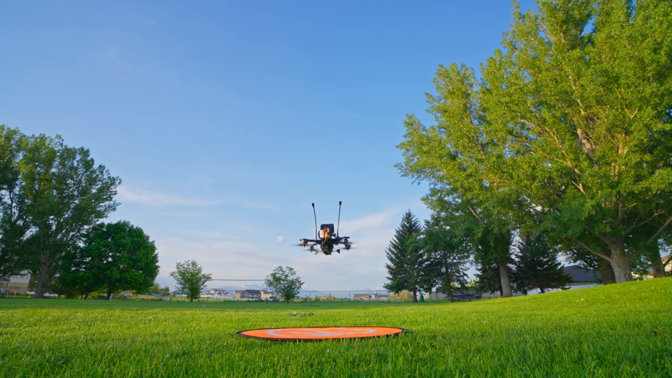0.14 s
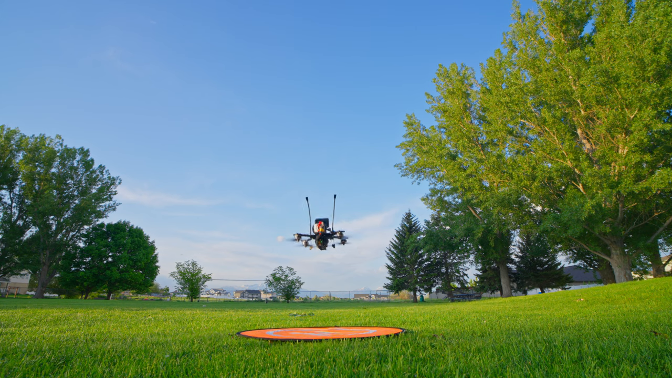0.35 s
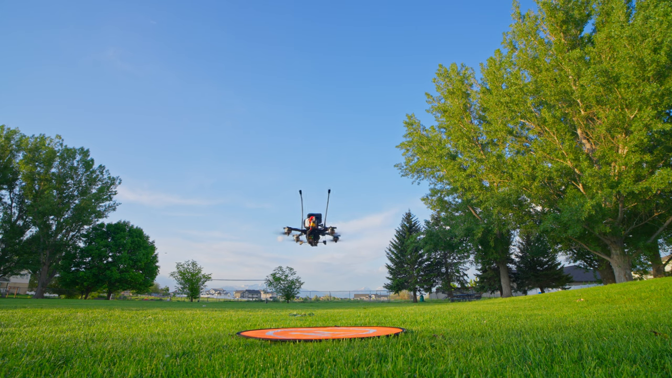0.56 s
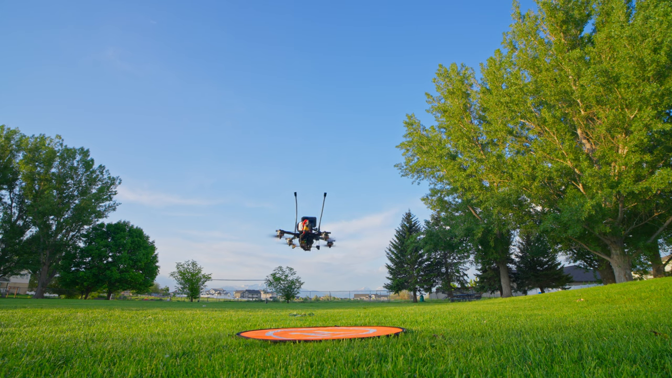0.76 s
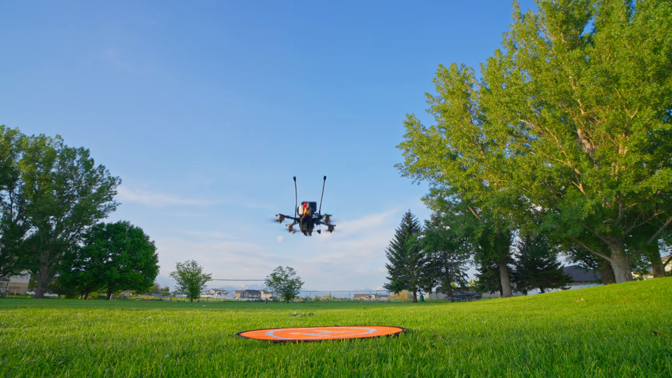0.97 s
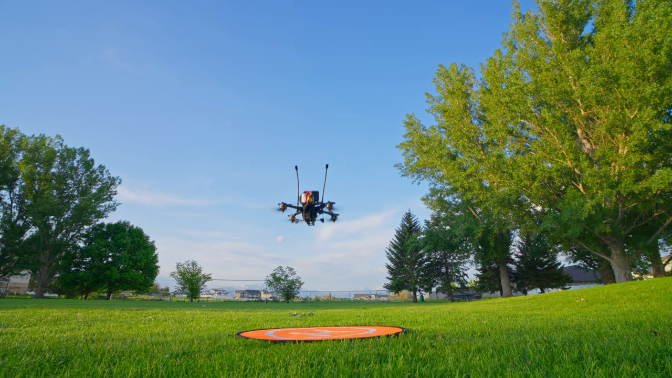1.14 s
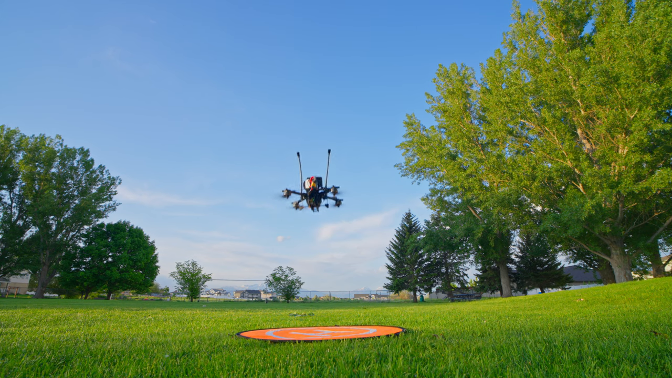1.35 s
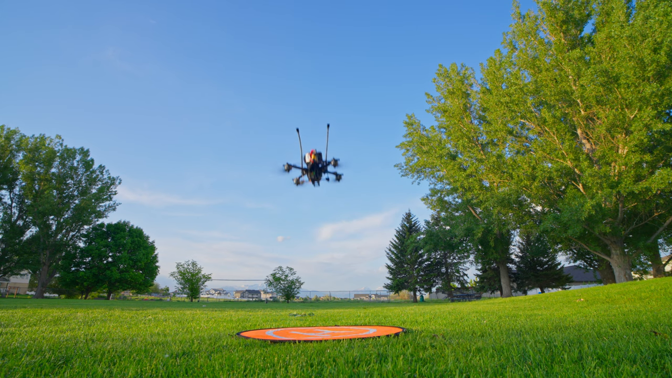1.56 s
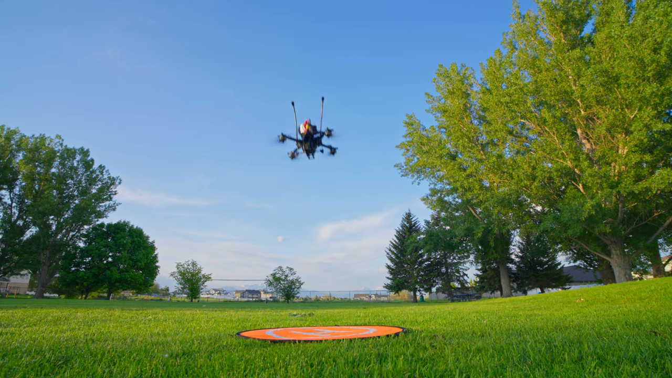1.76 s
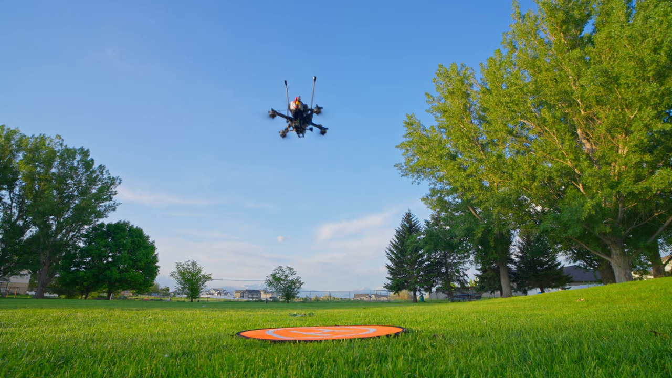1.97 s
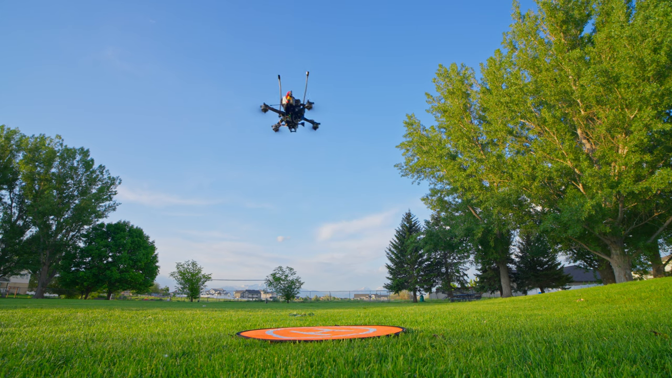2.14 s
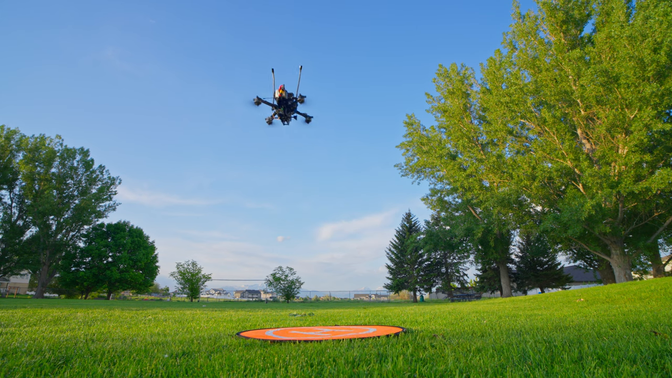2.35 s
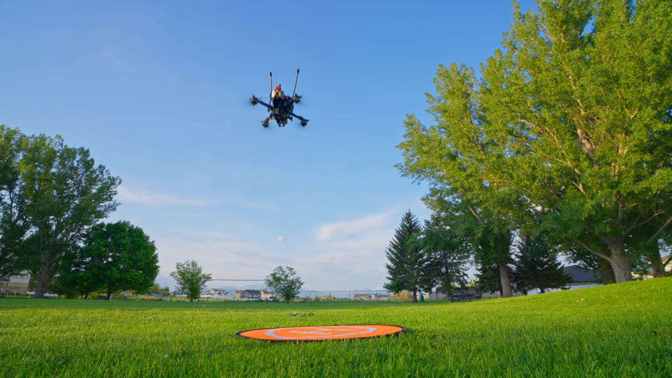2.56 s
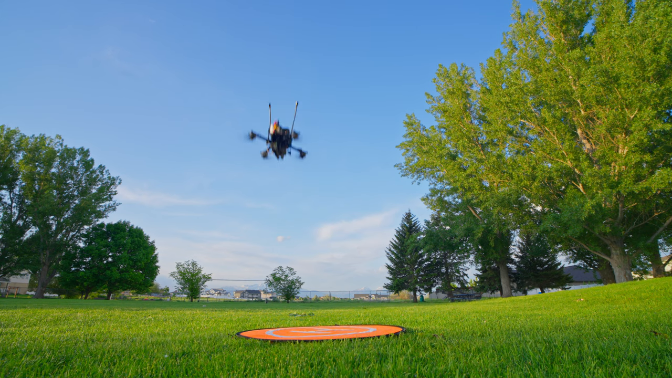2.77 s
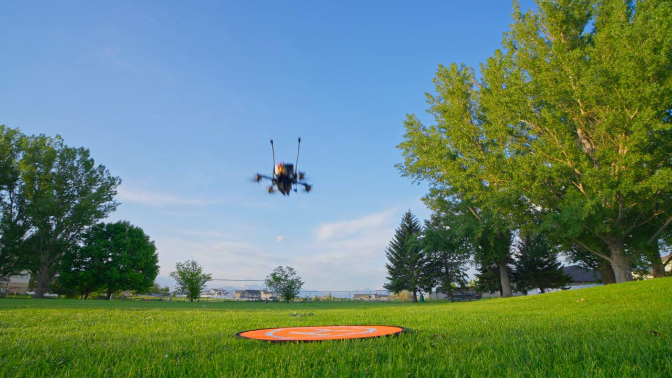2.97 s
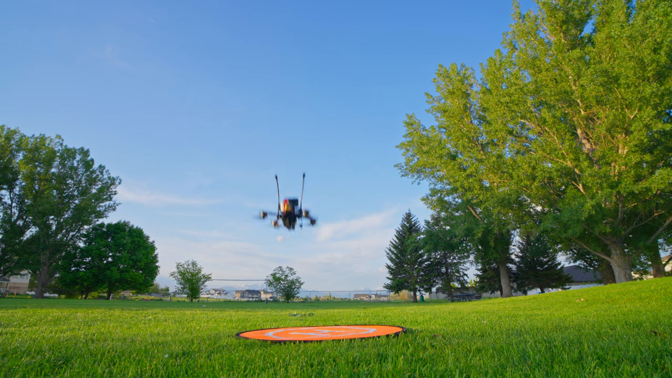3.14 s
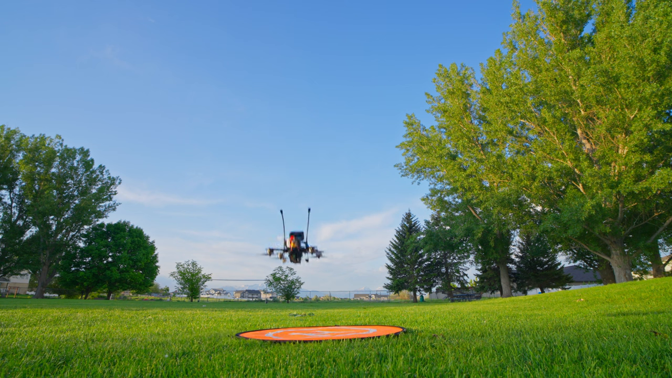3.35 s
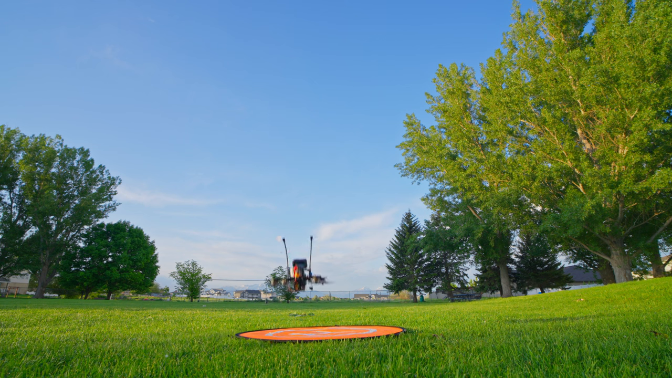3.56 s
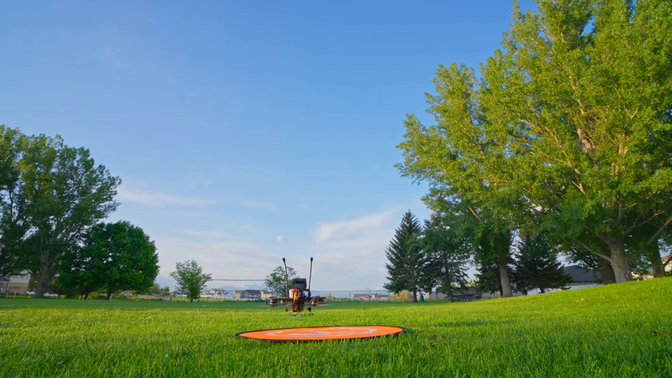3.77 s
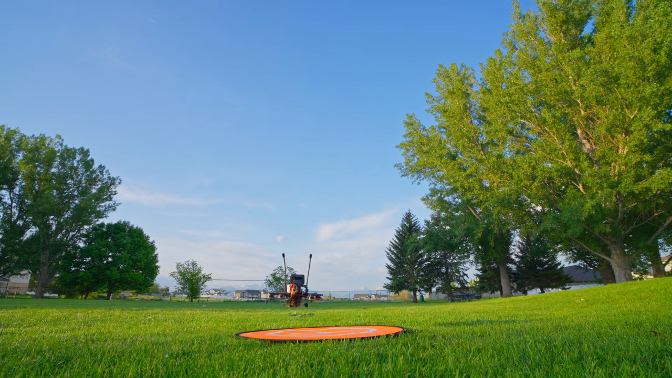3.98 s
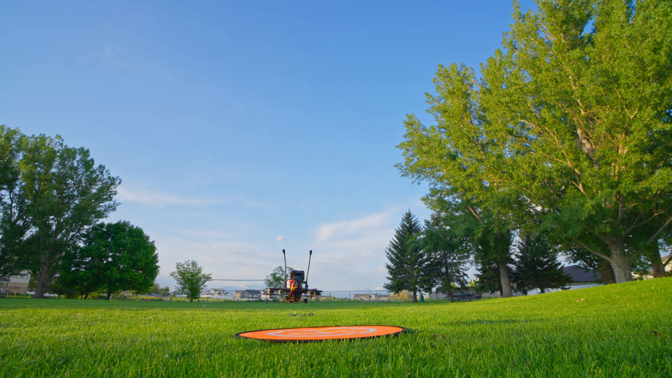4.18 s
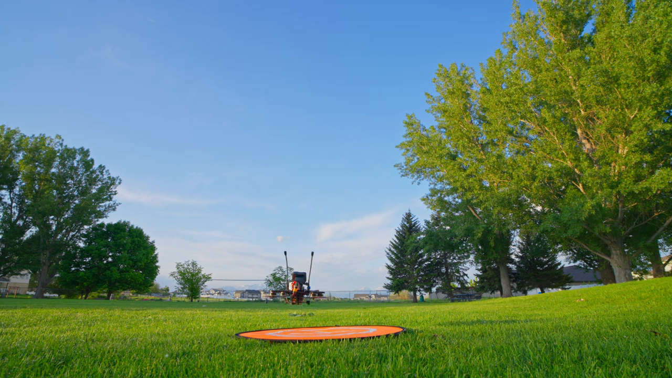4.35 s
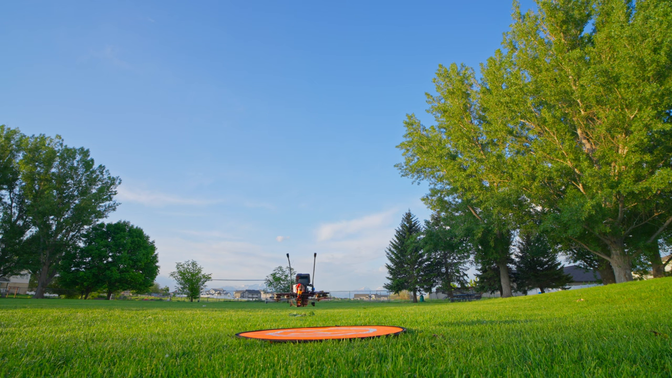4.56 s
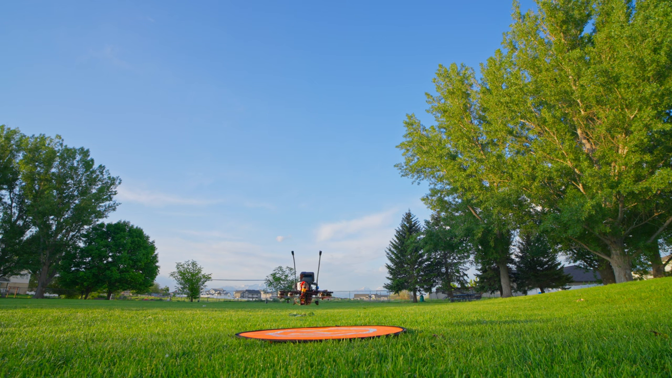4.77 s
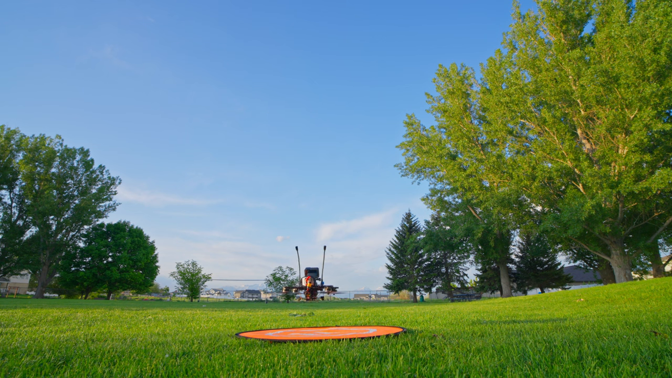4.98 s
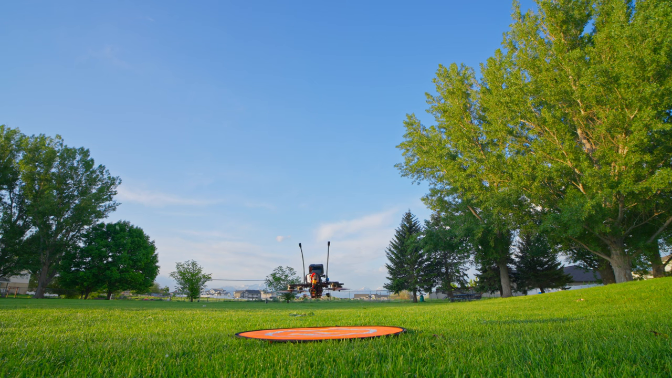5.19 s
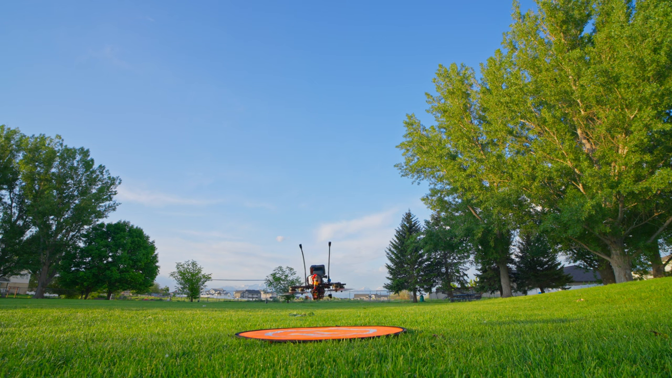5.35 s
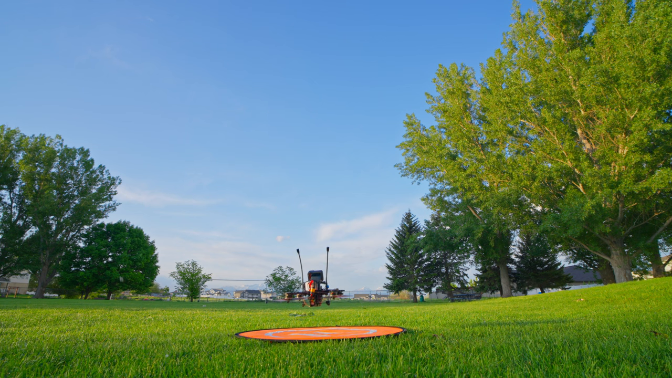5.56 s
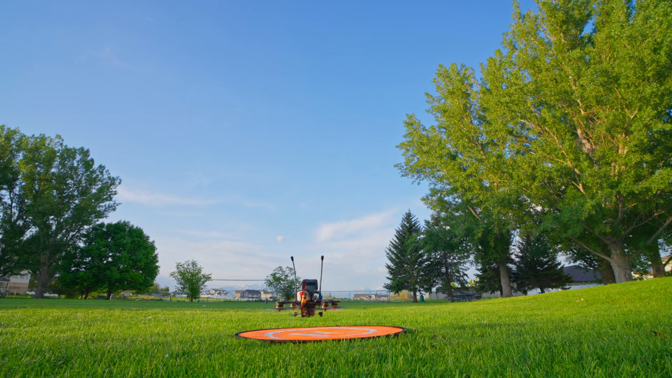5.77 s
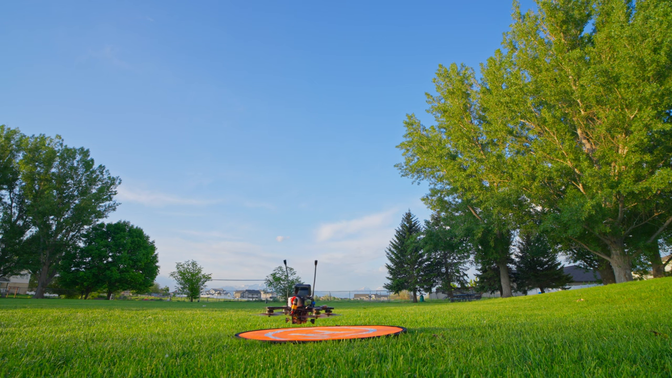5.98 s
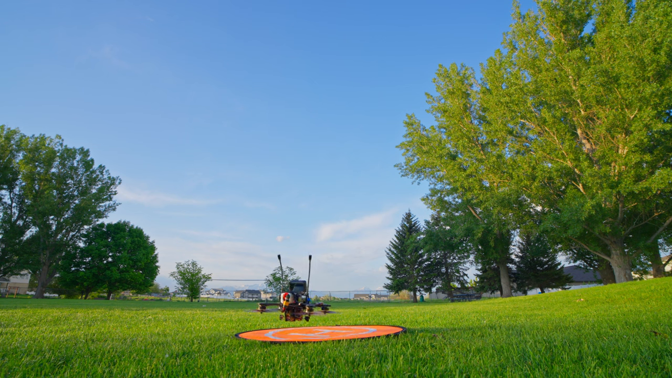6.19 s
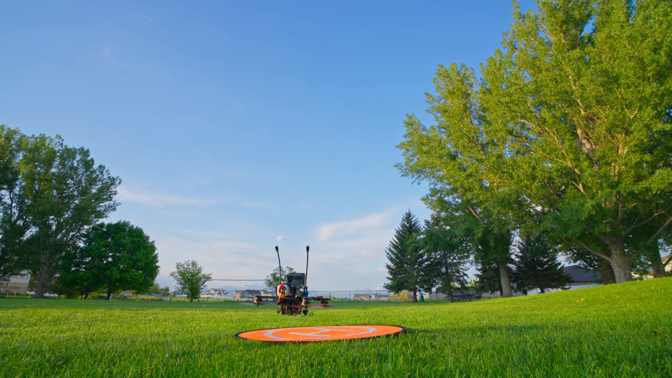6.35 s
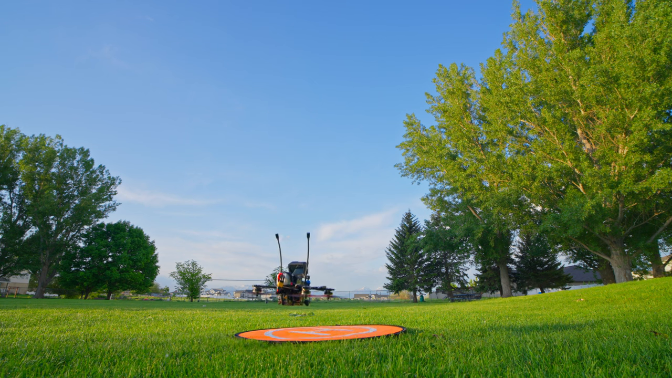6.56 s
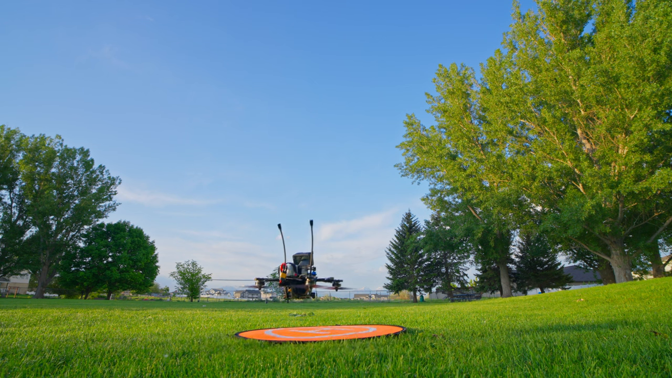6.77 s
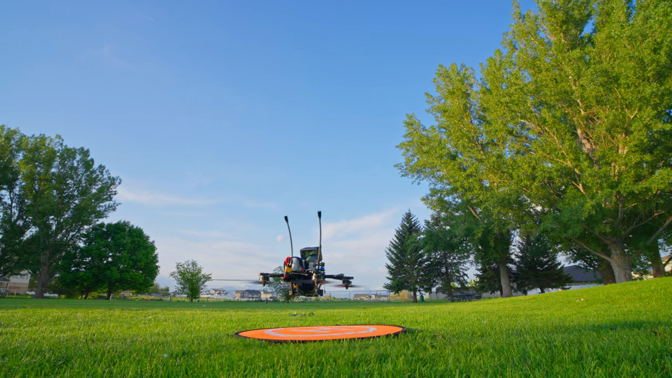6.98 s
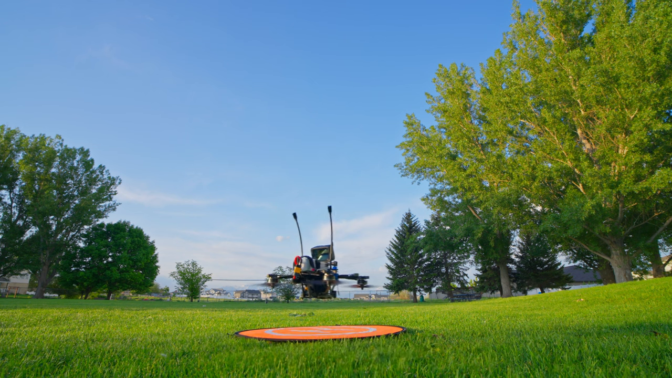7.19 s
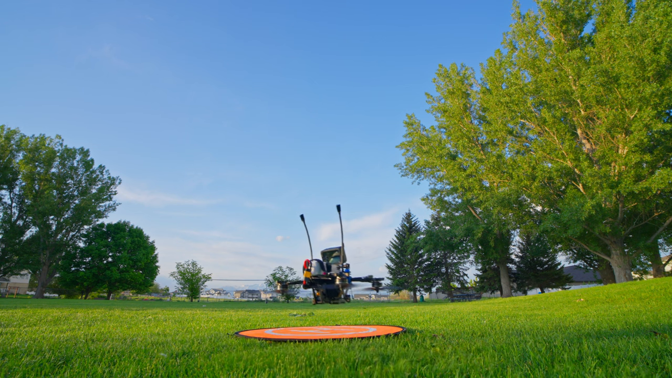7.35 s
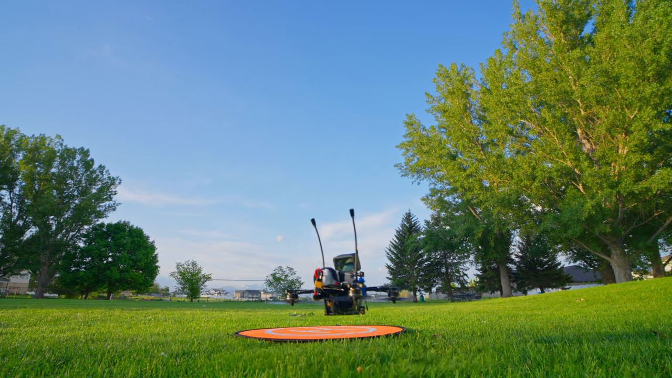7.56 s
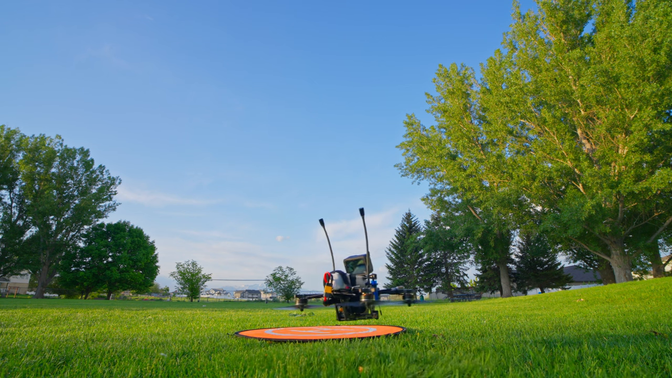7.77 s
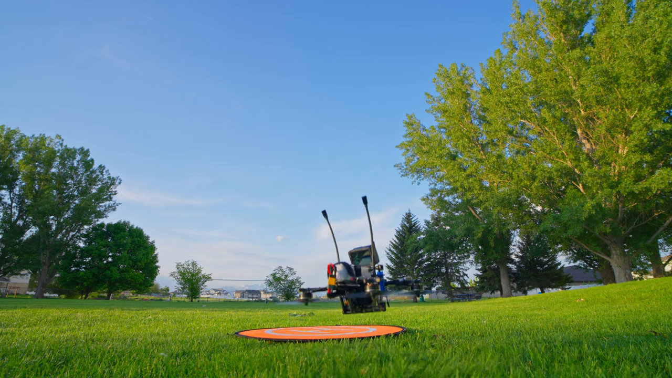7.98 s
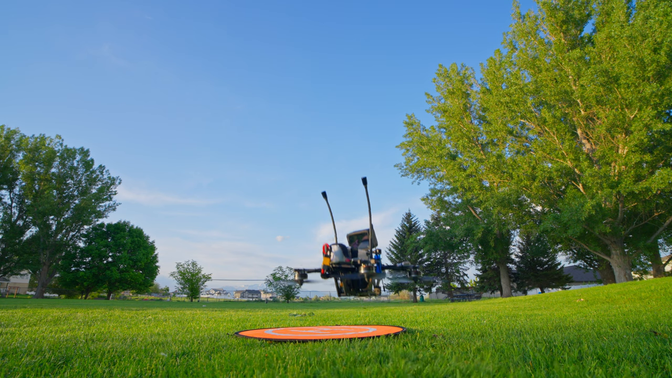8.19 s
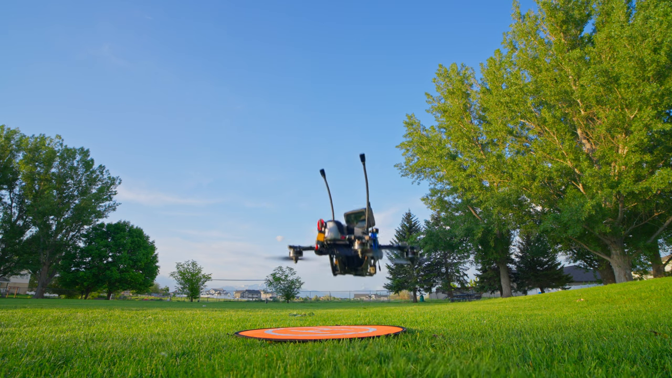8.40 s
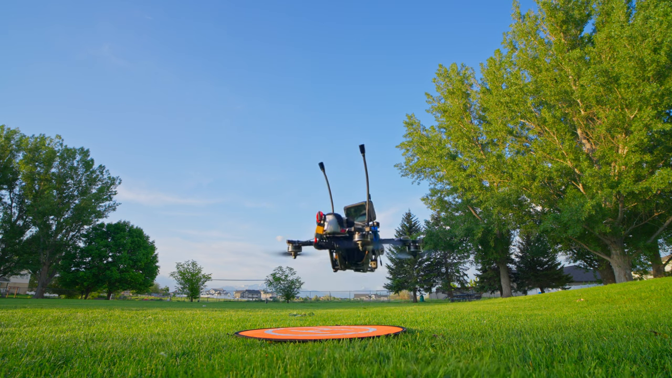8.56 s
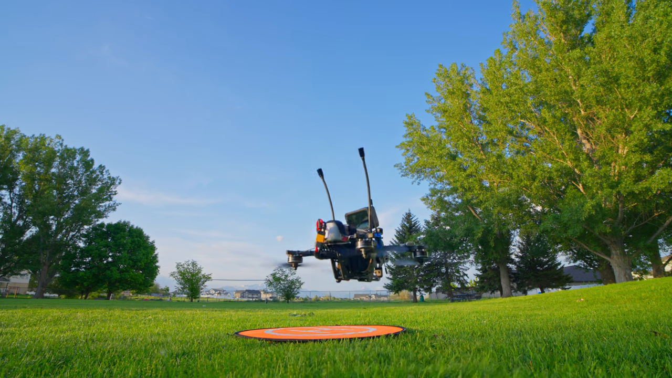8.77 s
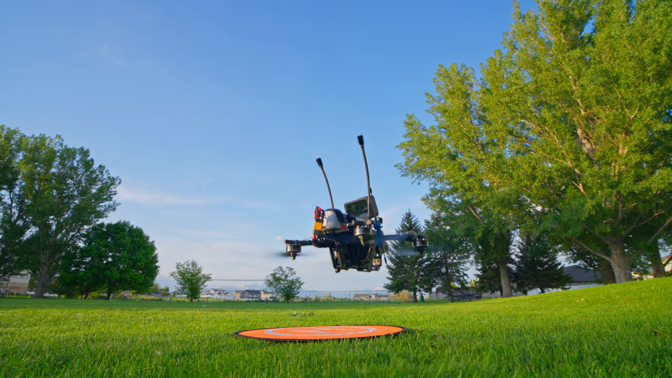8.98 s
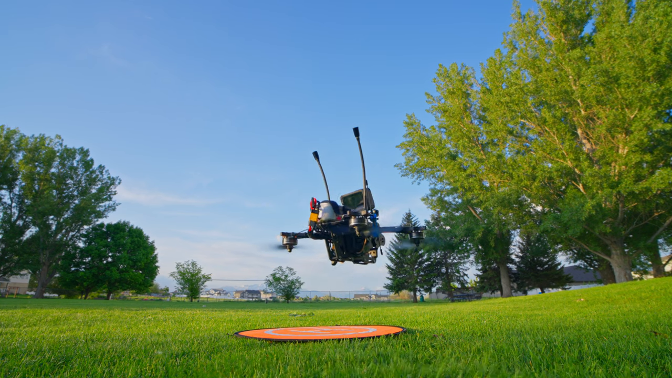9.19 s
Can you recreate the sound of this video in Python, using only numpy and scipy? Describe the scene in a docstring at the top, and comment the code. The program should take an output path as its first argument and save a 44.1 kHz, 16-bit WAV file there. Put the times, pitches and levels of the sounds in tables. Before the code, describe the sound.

A small four-propeller drone flies near a fixed microphone on open grass, already running at the start. From 0 to 2 s its raspy, beating buzz surges in pitch about every half second, with brief dips in level near 0.4 and 0.6 s and fleeting high whistles. Around 2 to 2.5 s, heard more from below, it turns brighter and airier; the pitch jumps, then sags deeply before surging again near 2.7 and 3.2 s. A push around 3.6 to 3.9 s catches the descent, with a sizzle and a low downwash thump. From 4 to 5.6 s it hovers quieter and steadier, with small thin whistles. From 6 s a duller whoosh and thicker hiss grow as it nears; sustained piercing whistles ring around 7.6 to 8.4 s. A sharper throttle push at 8.6 s lifts it, loud and close, still buzzing at about 9.2 s. Low gusts rumble intermittently.

```python
"""A small four-propeller drone

A small drone bobs up and down, then hovers low, its tones swelling as it drifts closer, and lifts again.
Four three-blade propellers at slightly different speeds buzz: each adds tones at multiples of its blade rate.
Shaped noise that swells with the passing blades makes the hiss, dull whoosh, thin sizzle and airy top.
Motor tones grow near a resonance, and whistles glide past it at set times.
Slow gusts of low noise are the downwash rumbling on the microphone."""
import sys
import numpy as np
from scipy import signal
from scipy.fft import rfft, irfft, next_fast_len
from scipy.io import wavfile

SR = 44100
rng = np.random.default_rng(int(sys.argv[2]) if len(sys.argv) > 2 else 0)


def file_out(sig):
    """Save sig as 16-bit WAV at sys.argv[1]."""
    # one column per channel
    cols = np.atleast_2d(sig).T
    # limit, then scale
    lim = np.clip(cols, -1, 1)
    pcm = np.round(lim * 32767).astype(np.int16)
    wavfile.write(sys.argv[1], SR, pcm)


N = 407035
TIME = np.arange(N) / SR   # seconds

BLADES = 3   # on each propeller
START_HZ = 485.2   # blade-pass rate of the fast pair before the first push
MOTOR_MODE_HZ = 4690   # main resonance of the motors

# steady blade load, one row per harmonic of the blade-pass rate: (edge-on [dB], shallow slant [dB],
# steep slant [dB], from below [dB], power of speed, share of the buzz's swing, roughness [0-1])
THRUST_TONES = [(-38.5, -40.5, -47.5, -53, 2.1, 0.07, 0.16), (-43.5, -42.5, -34.5, -37.5, 2.4, 0, 0.45),
                (-36.5, -33, -29, -32.5, 0.52, 0.36, 0.43), (-35.5, -32, -31, -33, .1, 0.61, 0.48)]


def from_db(db):
    """Decibels to gain."""
    return np.exp(np.asarray(db) * np.log(10) / 20)


def rms_one(x):
    """Scale to an rms (average strength) of 1."""
    return x / np.sqrt(np.mean(x ** 2) + 1e-20)


def in_time(rows):
    """Each column of a curve at every sample."""
    s, *columns = np.transpose(rows)
    return np.array([np.interp(TIME, s, c) for c in columns])


def at_hz(points, hz):
    """Gain of a spectrum at the given frequencies."""
    f, db = np.transpose(points)
    return from_db(np.interp(np.log(hz + 1e-9), np.log(f), db))


def drift(rate):
    """Smooth random motion of spread 1, changing about rate times a second."""
    # smoothed noise is made at every 40th sample, then joined by straight lines
    r = np.exp(-80 * np.pi * rate / SR)
    raw = rng.standard_normal(N // 40 + 2002)
    slow = signal.lfilter([1], [1, -2 * r, r * r], raw)[2000:]   # drop the start-up
    return np.interp(np.arange(N) / 40, np.arange(len(slow)), rms_one(slow))


def noise(colour):
    """Noise shaped by a spectrum, with an rms of 1."""
    size = next_fast_len(N)
    hz = np.arange(size // 2 + 1) * SR / size
    spectrum = rfft(rng.standard_normal(size)) * at_hz(colour, hz)
    return rms_one(irfft(spectrum, size)[:N])


def partial(angle, rough, flutter_rate):
    """A tone with an rms of about 1 whose height and phase flutter at random."""
    angle = (angle % (2 * np.pi)).astype(np.float32)
    steady_part = (1 + rough * drift(flutter_rate)) * np.cos(angle)
    stray_part = rough * drift(flutter_rate) * np.sin(angle)
    return (steady_part + stray_part) / np.sqrt(.5 + rough ** 2)


def ease(start, length):
    """A smooth step from 0 to 1."""
    return .5 - .5 * np.cos(np.pi * np.clip((TIME - start) / length, 0, 1))


def swells(rows, edge_s):
    """Gain of events that build, hold and die away."""
    gain = np.zeros(N)
    for start, length, db in rows:
        inside_s = np.minimum(TIME - start, start + length - TIME)
        gain += from_db(db) * np.clip(inside_s / edge_s + .5, 0, 1)
    return gain


def by_height(dbs, height):
    """Level in dB between the edge-on, slanting and underside views of the rotors."""
    return np.interp(height, np.linspace(0, 1, len(dbs)), dbs)


def resonance(hz, centre_hz, width_hz):
    """How strongly a housing mode answers a tone: 1 when in tune."""
    return 1 / (1 + ((hz - centre_hz) / width_hz) ** 2)


def downwash():
    """Air pushed down by the rotors: lumpy gusts on the microphone over nearly calm air."""
    # gusts reaching the microphone: (start [s], length [s], level before the lumps [dB])
    gusts = [(.2, 0.53, -43), (.7, 0.26, -56), (1.15, 0.3, -47), (1.53, .15, -45.5), (1.86, 0.29, -48),
             (2.62, 0.062, -54), (2.87, 0.29, -45.5), (3.33, 0.15, -44.5), (3.7, 0.41, -38.5),
             (4.2, 0.28, -48.5), (5.6, .45, -46), (6.12, 0.094, -47), (6.42, .36, -48), (6.85, 0.71, -59),
             (8.15, 0.22, -61), (8.5, 0.2, -53), (8.87, 0.38, -47)]
    # shape of the rumble: (frequency [Hz], relative level [dB])
    rumble_colour = [(15, -9), (35, -6), (70, 2.5), (120, 0), (200, -6), (330, -14.5), (700, -20.5),
                     (2000, -50)]
    strength = from_db(-59) + swells(gusts, edge_s=0.1)   # the first term is the calm air
    lumps = from_db(1.0 + 3.0 * drift(13))
    return strength * lumps * noise(rumble_colour)


def throttle():
    """Blade-pass rate of the fast pair: each push speeds it up, holds it and lets it settle."""
    # pushes of the throttle: (start [s], rise [s], top rate [Hz], release [s], fall [s], rate after [Hz])
    pushes = [(.138, .15, 559, .322, .14, 450), (.641, .12, 580, .796, .2, 490),
              (1.116, .13, 512, 1.25, .06, 510), (1.313, .12, 558, 1.446, .14, 504),
              (1.6, .1, 507, 1.787, .21, 446), (2.086, .16, 530, 2.294, .33, 374),
              (2.681, .17, 540, 2.862, .25, 439), (3.133, .1, 567, 3.28, .22, 467),
              (3.56, .13, 548, 3.868, .18, 464), (4.29, .2, 497, 4.906, .27, 472),
              (5.656, .46, 495, 6.259, .18, 480), (7.184, .58, 500, 8.337, .17, 456),
              (8.631, .16, 526, 8.916, .14, 486)]
    hz, before = START_HZ, START_HZ
    for start, rise, top, release, fall, after in pushes:
        hz = hz + (top - before) * ease(start, rise) + (after - top) * ease(release, fall)
        before = after
    return hz


def rotor_rates(fast_hz):
    """Four propellers follow the throttle as a fast and a slow pair; within a pair they drift apart and together."""
    # trim that holds the drone level:
    # (time [s], slow pair's speed [share of fast pair], split in each pair [share of fast pair])
    trim = [(0, .897, .002), (1.8, .897, .002), (2.2, .86, .002), (3.1, .865, .002), (3.3, .885, .009),
            (4.3, .905, .009), (5.5, .91, .006), (6.2, .885, .012), (7.2, .9, .012), (8, .9, .012),
            (8.55, .92, .004), (9.23, .895, .007)]
    slow, split = in_time(trim)
    places = [(1, 1), (1, -1), (slow, 1), (slow, -1)]   # (speed of the pair, side of the split)
    # each rotor strays by about 0.55 of the split, 1.5 times a second
    return fast_hz * np.array([pair + split * (side + .55 * drift(1.5)) for pair, side in places])


def spin(blade_hz, hunting, hunting_rate):
    """Shaft angles; each speed wavers at random, as the flight controller trims the motors."""
    speeds = np.array([hz * (1 + hunting * drift(hunting_rate)) for hz in blade_hz])
    return 2 * np.pi * np.cumsum(speeds, axis=1) / (BLADES * SR)


def dips():
    """Gain that dips briefly at set times."""
    # (time of the bottom [s], depth [dB], fall [s], recovery [s])
    dip_rows = [(.43, -6, 0.12, 0.17), (.64, -8.5, 0.031, 0.033), (4.06, -9, 0.015, 0.04)]
    dip_db = 0
    for s, db, fall, recovery in dip_rows:
        dip_db = dip_db + db * np.exp(-np.maximum((s - TIME) / fall, (TIME - s) / recovery))
    return from_db(dip_db)


def flares():
    """A motor lingering near its resonance: each whistle builds, glides a little in pitch and dies."""
    # (start [s], length [s], level before the waver [dB], start pitch [Hz], end pitch [Hz])
    whistles = [(0.175, .04, -22, 4600, 4780), (0.73, 0.12, -31, 4780, 4790), (.94, .05, -26.5, 4750, 4630),
                (1.141, .15, -24.5, 4640, 4770), (1.57, 0.19, -27.5, 4720, 4690),
                (1.82, 0.026, -18, 4720, 4660), (3.171, 0.07, -27, 4700, 4800),
                (3.602, .04, -26, 4620, 4750), (4.466, 0.1, -25.5, 4640, 4700),
                (4.603, 0.023, -17, 4690, 4660), (4.722, 0.12, -31, 4670, 4700),
                (4.84, 0.11, -22, 4730, 4640), (6.02, .04, -22, 4640, 4680), (6.15, 0.18, -28, 4690, 4730),
                (7.582, 0.315, -21, 4680, 4720), (7.899, .32, -18.5, 4750, 4680),
                (8.23, .16, -22.5, 4690, 4620), (8.696, 0.043, -19, 4600, 4800)]
    edge_s = 0.029   # time to build and to die
    hz = np.full(N, float(MOTOR_MODE_HZ))
    for start, length, _, from_hz, to_hz in whistles:
        glide = from_hz + (to_hz - from_hz) * ease(start, length)
        hz = np.where(TIME > start - edge_s / 2, glide, hz)
    waver = from_db(1.5 * drift(9.5))
    level = swells([row[:3] for row in whistles], edge_s) * waver
    return level * partial(2 * np.pi * np.cumsum(hz) / SR, rough=.28, flutter_rate=45)


def motor_whistle(angles, blade_hz, hiss_db):
    """Each motor's magnetic ripple sings faintly near its resonance; set whistles flare over it."""
    ripple_order, upper_order = 28, 35   # ripples per turn of the shaft
    shaft_hz = blade_hz / BLADES
    out = flares()
    response = resonance(ripple_order * shaft_hz, MOTOR_MODE_HZ, width_hz=35)
    for angle, level in zip(angles, from_db(hiss_db - 7.5) * response):
        out = out + level * partial(ripple_order * angle, rough=.4, flutter_rate=50)
    # one motor of the slow pair also has a second, higher mode
    upper = from_db(hiss_db - 5.5) * resonance(upper_order * shaft_hz[2], 5350, width_hz=39)
    return out + upper * partial(upper_order * angles[2], rough=0.93, flutter_rate=84)


def chop(angles, shares, depth, flicker_db):
    """Turbulent noise swells with every passing blade and comes in tiny bursts."""
    swell = depth * shares @ np.cos(BLADES * angles)
    bursts = from_db(flicker_db * drift(170) + 0.7 * drift(12))
    return rms_one(np.exp(swell) * bursts)


def blade_air(hiss_db, top_db, height):
    """Turbulence on the blades: a dull whoosh, a hiss, a sizzle, and an airy top that is brighter from below."""
    # dull side of the noise, strongest with the rotors edge-on: (time [s], level [dB])
    whoosh_curve = [(0, -49), (1.9, -59), (2.8, -84), (3.7, -61), (5.4, -57), (6.07, -37.5), (7, -42),
                    (7.8, -35.5), (9.23, -43)]
    # blades buffeting in their own wake, short swells of the whoosh: (time [s], peak level [dB])
    buffet_rows = [(.63, -35), (2.43, -54), (3.88, -38)]
    # vortices shed from the blade edges: (time [s], level when seen edge-on [dB])
    sizzle_curve = [(0, -40), (.55, -33), (.9, -29), (1.8, -32), (2.95, -35), (3.37, -47), (3.65, -22.5),
                    (4.1, -32.5), (4.7, -27), (5.6, -28), (6.27, -23), (7.04, -31), (7.7, -24), (9.23, -29)]
    # shapes of the noises: (frequency [Hz], relative level [dB])
    whoosh_colour = [(40, -17), (110, -6), (270, 0), (350, -10.5), (550, 5), (800, 5), (1150, 1), (1800, 6),
                     (3500, -14)]
    hiss_colour = [(600, -40.5), (1050, -13.5), (1600, -7.5), (2300, -0.5), (3200, 2.5), (4100, 2),
                   (5000, -1), (5900, -7), (8000, -12.5), (12000, -39)]
    sizzle_colour = [(3000, -27.5), (4100, -3.5), (4600, 1.5), (5400, -3), (5900, -6), (7000, -31)]
    below_colour = [(3500, -45), (5200, 2), (6500, 2.5), (8800, 4.5), (10500, 3.5), (13000, -1.5),
                    (16000, -5)]   # airy top heard from below
    level_colour = [(3500, -25), (5200, -9.5), (6500, 2), (8800, 3), (10500, -0.5), (13000, -7),
                    (16000, -11.5)]   # airy top heard from the side

    top = np.sqrt(height) * noise(below_colour) + np.sqrt(1 - height) * noise(level_colour)
    buffets = sum(from_db(db) * np.exp(-((TIME - s) / 0.032) ** 2) for s, db in buffet_rows)
    whoosh = (from_db(in_time(whoosh_curve)[0]) + buffets) * noise(whoosh_colour)
    sizzle = from_db(in_time(sizzle_curve)[0] - 9.6 * height) * noise(sizzle_colour)
    hiss = from_db(hiss_db + 0.6) * noise(hiss_colour)
    return whoosh + sizzle + hiss + from_db(top_db) * top


def blade_buzz(angles, blade_hz, shares, height, count=19):
    """Blades chop through eddies: a long row of rougher upper harmonics, coloured by the view."""
    # upper blade harmonics: (frequency [Hz], relative level from the side [dB], from below [dB])
    buzz_colour = [(1800, -6, -6), (2400, -5, -4), (2700, -5, 0), (3300, -4, -3), (3900, -8, -5),
                   (5000, -9, -3.5), (5900, -14, -6), (7200, -19, -12), (11000, -24, -18)]
    out, colour = 0, np.array(buzz_colour)
    step = slice(None, None, 200)   # the gain is worked out at every 200th sample
    for angle, hz, share in zip(angles, blade_hz, shares):
        for k in range(len(THRUST_TONES) + 1, count):   # the harmonics above the thrust tones
            side = at_hz(colour[:, [0, 1]], k * hz[step])
            below = at_hz(colour[:, [0, 2]], k * hz[step])
            gain = np.interp(TIME, TIME[step], side + height[step] * (below - side))
            phase = k * BLADES * angle + rng.uniform(0, 2 * np.pi)
            out = out + share * gain * partial(phase, rough=.36, flutter_rate=22)
    return out


def thrust_tones(angles, shares, speed_db, buzz_db, height):
    """Steady blade load gives clear harmonics, fluttering with eddies; imbalance adds faint shaft tones."""
    # the drone drifts towards the microphone: (time [s], gain of these tones [dB])
    nearness = [(0, -1), (.55, 1.5), (.78, 3), (1.05, -1), (1.45, 2.5), (3.05, -2), (3.25, 1.5), (3.5, -3),
                (3.75, 1), (4.2, -3), (5.3, 1), (6.2, 5), (7.7, 7.5), (8.5, 7.5), (8.77, 9.5), (8.95, 5.5),
                (9.23, 6.5)]
    # imbalance: (multiple of the shaft rate, level relative to the first harmonic [dB])
    shaft_tones = [(1, -20.5), (2, -29.5), (4, -20.5), (5, -18)]
    near_db, = in_time(nearness)
    levels = []
    for *dbs, power, follows, _ in THRUST_TONES:
        view_db = by_height(dbs, height)
        levels.append(from_db(near_db + view_db + power * speed_db + follows * buzz_db + drift(3.8)))
    # the hardest-working rotor dominates the higher harmonics, more so from below
    lead = 0.033 + 0.34 * np.sqrt(height)
    out = 0
    for k, (level, (*_, rough)) in enumerate(zip(levels, THRUST_TONES), 1):
        weights = shares[:, None] ** (1 + lead * (k - 1))
        weights = weights / np.linalg.norm(weights, axis=0)
        for angle, weight in zip(angles, weights):
            phase = k * BLADES * angle + rng.uniform(0, 2 * np.pi)
            out = out + weight * level * partial(phase, rough, flutter_rate=59)
    for multiple, db in shaft_tones:
        tone = partial(round(multiple) * angles[0], rough=0.7, flutter_rate=14)
        out = out + levels[0] * from_db(db) * tone
    return out


def scene():
    """The drone and its downwash, nearly alike in both channels."""
    # height of the flight: (time [s], height [0 level with the microphone to 1 seen from below])
    height_curve = [(0, 0.38), (.75, 0.42), (1.25, 0.39), (1.5, 0.48), (2, 0.84), (2.5, 1), (2.8, 0.8),
                    (3.25, 0.45), (3.7, 0.012), (7.8, 0.039), (8.5, 0.29), (9.23, 0.46)]
    # blade turbulence, louder as the drone nears or turns its underside:
    # (time [s], hiss before the effect of speed [dB], airy top relative to the hiss [dB])
    hiss_curve = [(0, -25.5, -0.5), (.55, -24, -1), (1.05, -27.5, .5), (1.5, -25, 1.5), (1.85, -22.5, 1.5),
                  (2.05, -22, 1), (2.35, -27, 3.5), (2.7, -20, 0.5), (2.9, -28, 2.5), (3.2, -25.5, -1),
                  (3.55, -26.5, -1.5), (4.2, -31.5, -1.5), (4.6, -29, -0.5), (5.6, -27, -1.5),
                  (6.1, -25, 0), (6.5, -22, -3.5), (7.5, -19, -5.5), (9.23, -22.5, -1.5)]
    # upper blade harmonics, strongest from below and under load: (time [s], balance against the hiss [dB])
    buzz_curve = [(0, -5), (.3, 2), (.5, -6), (.68, -7), (.8, -5), (1.1, -8), (1.7, -7.5), (2.05, -4),
                  (2.3, -2), (2.65, -5), (2.87, 0), (3.1, 2), (3.33, -3.5), (3.7, -7.5), (5.3, -14),
                  (8, -8), (8.8, -6.5), (9.23, -7)]
    # relative share of each propeller: (thrust tones [dB], upper harmonics [dB])
    rotor_db = [(3, -1), (0, -4.5), (-1, -7.5), (-4, -13)]

    fast_hz = throttle()
    speed_db = 20 * np.log10(fast_hz / START_HZ)
    blade_hz = rotor_rates(fast_hz)
    angles = spin(blade_hz, hunting=0.003502, hunting_rate=12.98)
    rotor_gain = from_db(rotor_db)
    thrust_share, buzz_share = (rotor_gain / np.linalg.norm(rotor_gain, axis=0)).T
    height = np.clip(in_time(height_curve)[0], 0, 1)

    hover_db, top_db = in_time(hiss_curve)
    hiss_db = hover_db + 1.5 * speed_db   # the hiss grows with rotor speed
    buzz_db = in_time(buzz_curve)[0]
    broad_db = hiss_db - 10 * np.log10(1 + from_db(buzz_db) ** 2)   # buzz and hiss share the turbulent power

    buzz = from_db(broad_db + buzz_db - 1.0) * blade_buzz(angles, blade_hz, buzz_share, height)
    air = blade_air(broad_db, hiss_db + top_db, height)
    air = air * chop(angles, thrust_share, depth=0.14, flicker_db=0.89)
    tones = thrust_tones(angles, thrust_share, speed_db, buzz_db, height)
    drone = dips() * (tones + buzz + air + motor_whistle(angles, blade_hz, hiss_db))
    # a second, fainter rumble of opposite sign in the two channels gives a little width
    width = from_db(-22.0) * downwash() * np.array([[1], [-1]])
    return drone + downwash() + width


def record(dry):
    """A steep filter cuts the top above 15800 Hz."""
    top_cut = signal.ellip(12, .1, 80, 15800, fs=SR, output="sos")
    return signal.sosfilt(top_cut, dry)


dry = scene()
out = record(dry)
file_out(out)
```